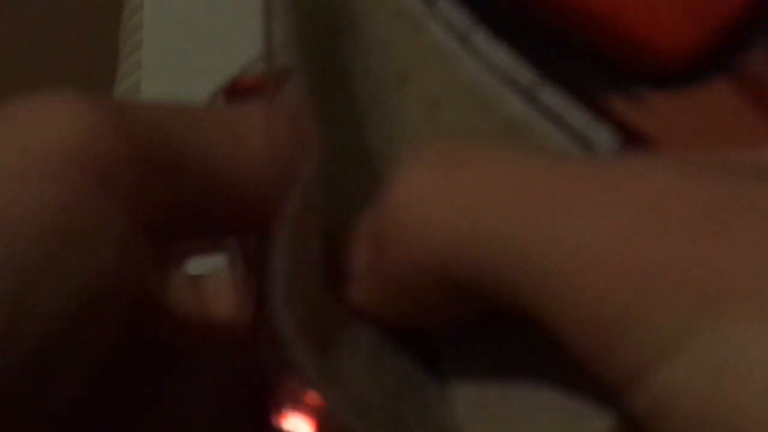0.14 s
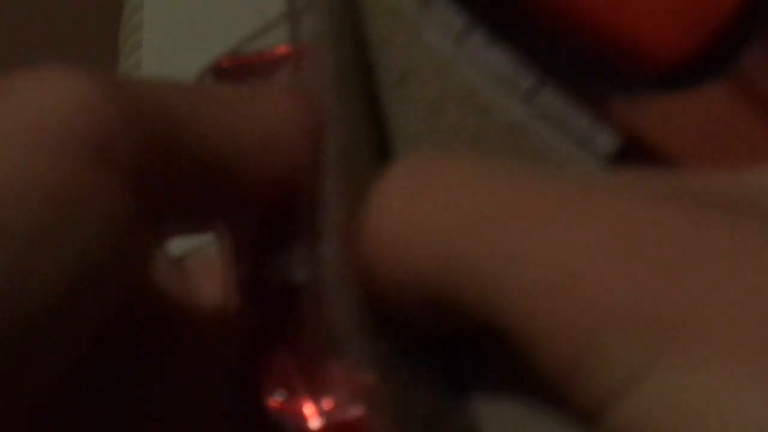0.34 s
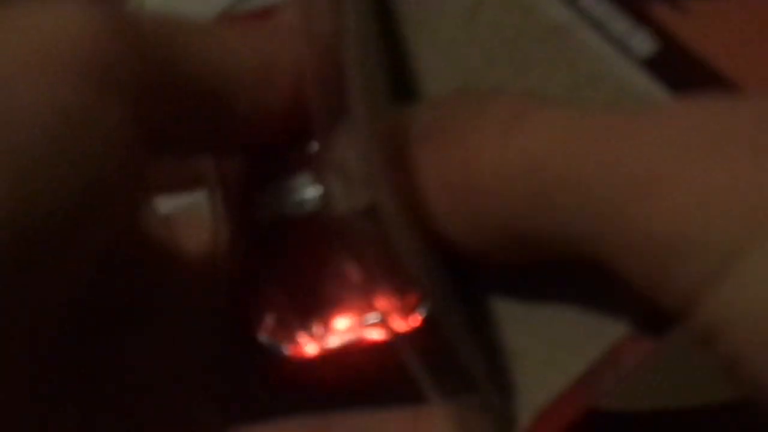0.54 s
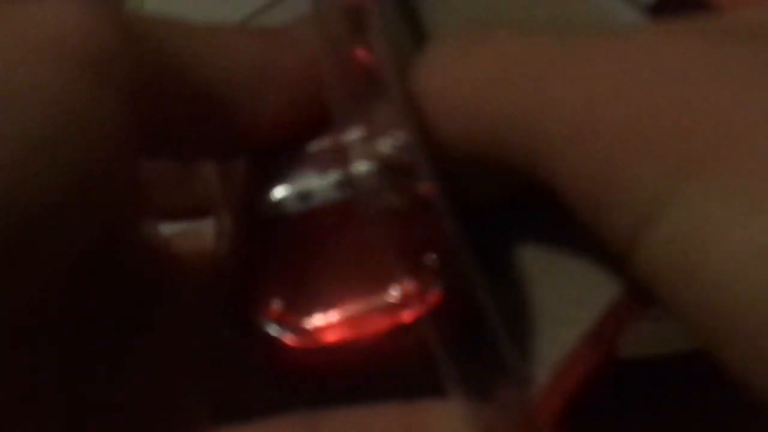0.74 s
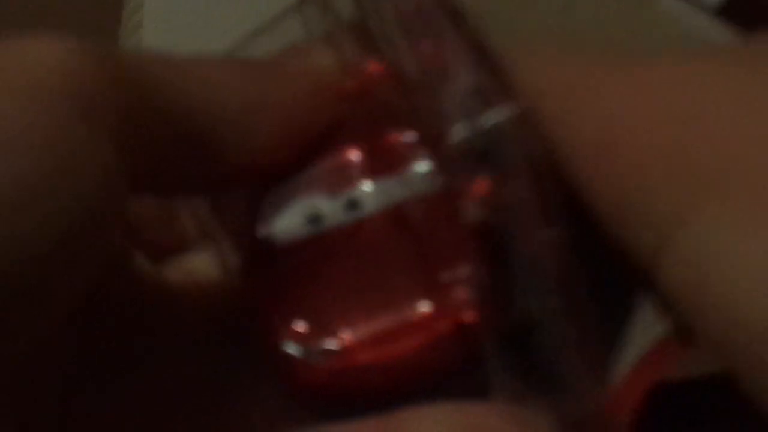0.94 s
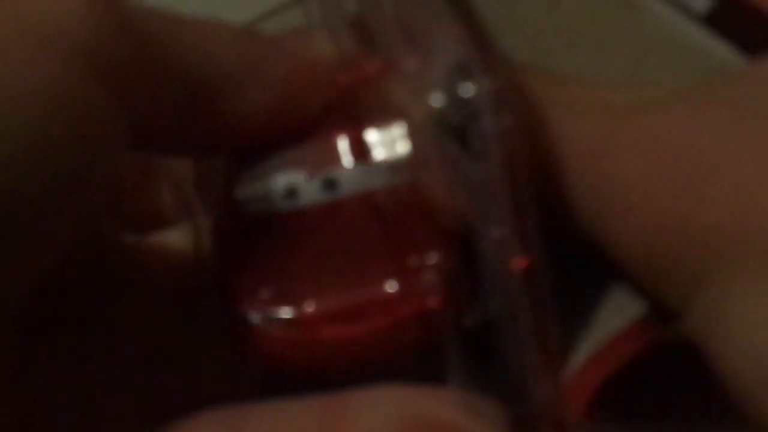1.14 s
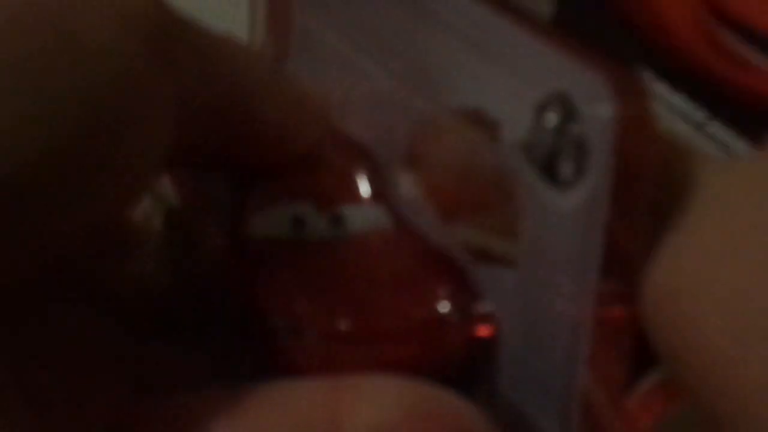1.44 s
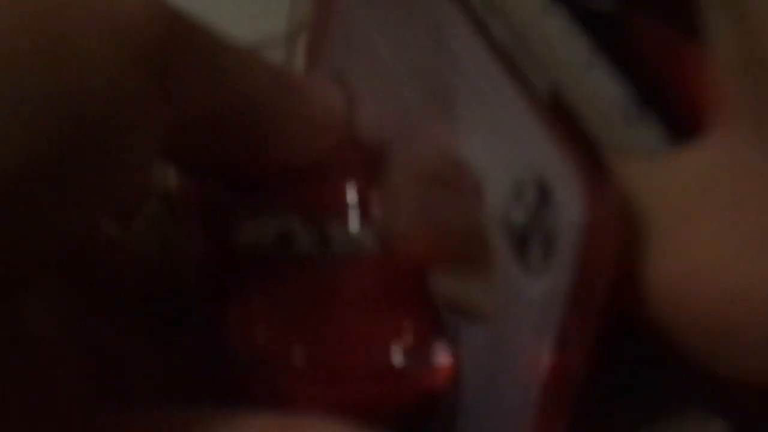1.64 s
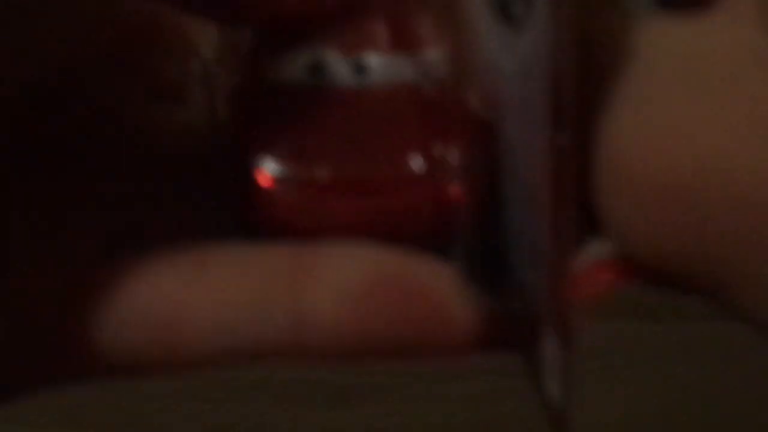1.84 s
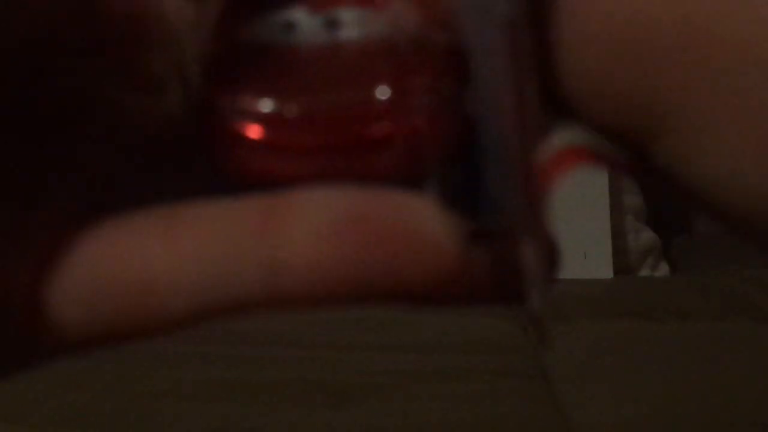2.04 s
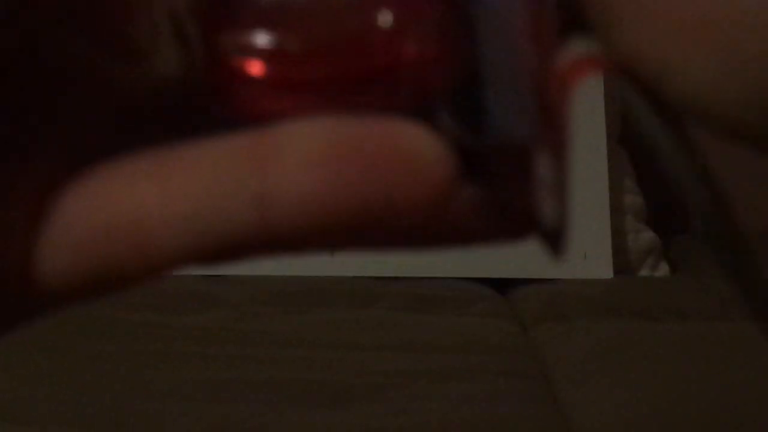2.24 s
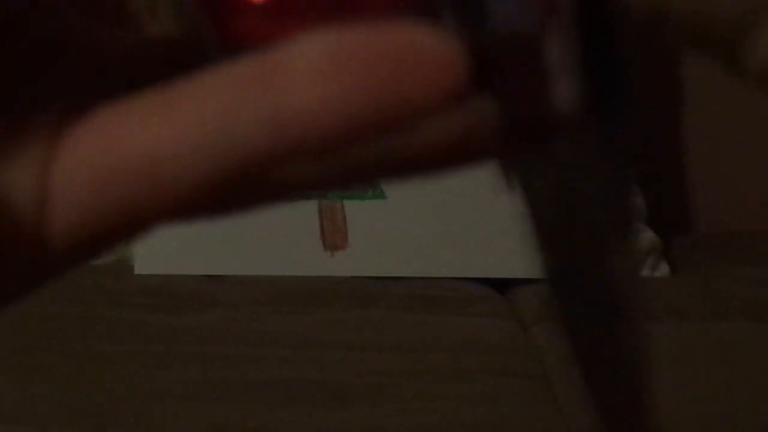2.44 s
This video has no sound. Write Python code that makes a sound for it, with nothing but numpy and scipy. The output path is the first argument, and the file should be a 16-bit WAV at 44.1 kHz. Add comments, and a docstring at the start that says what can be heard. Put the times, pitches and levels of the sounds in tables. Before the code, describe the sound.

Stiff plastic blister packaging snaps very loudly, then crackles and pops before its card tears free

```python
"""Blister pack prised off its card

A plastic blister pack is prised off its card by hand, close to the microphone in a small room. The stiff
shell buckles with one very loud snap and several small ones: noise cracks and dying sine modes. Filtered
runs of clicks make the crinkles, finger rubs, bumps and the card's tearing near the end; single creases
pop or tick and the freed card knocks. A table echo, a short room tail and a noise floor surround it all.
"""
import sys
import numpy as np
from scipy import signal
from scipy.fft import rfft, irfft
from scipy.io import wavfile

SR = 44100
rng = np.random.default_rng(int(sys.argv[2]) if len(sys.argv) > 2 else 0)


def int16_out(signal):
    """Quantize to a 16-bit WAV file."""
    q = np.round(np.clip(np.atleast_2d(signal).T, -1, 1) * 32767)
    wavfile.write(sys.argv[1], SR, q.astype(np.int16))


N = 114660
RING_SAMPLES = SR // 8
CRACK_T60_S = 0.0084  # base decay of a crack's noise
SLIPS_PER_S, SLIP_SPREAD_DB = 5500, 2  # hands on plastic

# Modes of the plastic shell. Each row: base frequency in Hz, relative level in dB, base t60 in s.
SHELL_MODES = [(688, -9, 0.0093), (1023, 3, 0.0048), (1247, -1.5, 0.0052), (1680, 0, 0.006),
               (1972, -2.5, 0.0072), (2214, -8.5, 0.01), (2920, -6, 0.005), (3246, -9, 0.012),
               (3920, -6, 0.0041), (4830, -9.5, 0.0016)]
# Bright spectrum of the clicks heard directly. Each row: frequency in Hz, relative level in dB.
FIZZ_SPECTRUM = [(1000, -1), (3500, 8), (6000, 5.5), (11000, 6), (15000, -2.5)]


def from_db(db):
    """Decibels to gain."""
    return 10 ** (np.asarray(db) / 20)


def rms_one(x):
    """Scale to rms 1."""
    return x / np.sqrt(np.mean(x ** 2) + 1e-20)


def add(out, start_s, x):
    """Mix x into out from start_s."""
    i = int(start_s * SR)
    out[i:i + len(x)] += x[:len(out) - i]


def dull(x, hz):
    """One-pole low-pass."""
    return signal.lfilter(*signal.butter(1, min(hz, SR / 2.2), fs=SR), x)


def low_cut(x, hz):
    """Two-pole high-pass."""
    return signal.lfilter(*signal.butter(2, hz, "high", fs=SR), x)


def resonate(x, hz, q):
    """Resonant band-pass at hz."""
    return signal.lfilter(*signal.iirpeak(hz, q, fs=SR), x)


def colour(x, spectrum, size=4096):
    """Causal minimum-phase filter with the given spectrum; white noise keeps its power."""
    hz, db = np.transpose(spectrum)
    bin_hz = np.arange(size // 2 + 1) * SR / size
    log_gain = np.log(from_db(np.interp(np.log(bin_hz + 1), np.log(hz), db)))
    # folding the cepstrum onto positive time makes the response causal
    cepstrum = np.r_[0, 2 * irfft(log_gain)[1:size // 2]]
    response = irfft(np.exp(rfft(cepstrum, size)))
    return signal.fftconvolve(x, response / np.linalg.norm(response))[:len(x)]


def ring(modes, stretch):
    """Struck modes as dying sines of alternating sign, peak 1; stretch scales every t60."""
    t = np.arange(RING_SAMPLES) / SR
    x = np.zeros(RING_SAMPLES)
    for k, (hz, db, t60_s) in enumerate(modes):
        decay = from_db(db - 60 * t / (t60_s * stretch))
        x += (-1) ** k * decay * np.sin(2 * np.pi * hz * t)
    return x / np.abs(x).max()


def grains(length_s, per_s, spread_db):
    """Clumps of random, uneven clicks that swell and fade, rms 1 over their length, then silence."""
    swell_shape = 0.38  # low: square bursts, high: rounded
    clump_s, clump_db = .002, 3  # the material sticks and lets go, so clicks come in clumps
    count = SR // 5
    index = np.arange(count)
    swell = np.sin(np.pi * np.clip(index / (length_s * SR), 0, 1)).clip(0) ** swell_shape
    sizes = from_db(spread_db * np.minimum(rng.exponential(1, count), 4))
    signs = rng.choice([-1, 1], count)
    clump_gains = from_db(clump_db * rng.standard_normal(count).clip(-2, 2))
    clumps = clump_gains[(index / (clump_s * SR)).astype(int)]
    clicks = rng.random(count) < per_s / SR
    x = swell * clumps * sizes * signs * clicks
    return x * np.sqrt(length_s * SR / (np.sum(x ** 2) + 1e-9))


def friction(rows, spectrum, per_s, spread_db):
    """Dense tiny slips sound through the material and hiss directly."""
    out = np.zeros(N)
    for start_s, length_s, db, fizz_db in rows:
        slips = grains(length_s, per_s, spread_db)
        body = rms_one(colour(slips, spectrum)) * slips.std()
        fizz = from_db(fizz_db) * colour(slips, FIZZ_SPECTRUM)
        add(out, start_s, from_db(db) * (body + fizz))
    return out


def snaps():
    """Each buckle cracks with broad noise, rings the shell and flexes the whole pack."""
    # Each row: start in s, level in dB, ring length factor, low-pass in Hz, flex level re shell in dB.
    buckles = [(0.1984, -20.5, 1.3, 1780, -33), (0.2121, 11, 2.5, 6400, -25.5),
               (0.586, -25.5, 2.4, 2360, -37.5), (0.6012, -20.5, 1.64, 2200, -39),
               (0.6319, -11, 0.46, 7100, -37), (1.5958, -12.5, 2.3, 2700, -17),
               (1.612, -27.5, 5.5, 5040, -15), (1.6277, -24.5, 2.5, 2390, -9)]
    # Modes of the flexing pack. Each row: frequency in Hz, relative level in dB, base t60 in s.
    flex_modes = [(204, -7, 0.039), (293, -2, 0.046), (387, -2, 0.042), (497, 3, 0.017)]
    crack_db, shell_low_hz = -13.5, 324
    out, t = np.zeros(N), np.arange(RING_SAMPLES) / SR
    for start_s, db, stretch, dull_hz, flex_db in buckles:
        decay = from_db(crack_db - 60 * t / (CRACK_T60_S * stretch))
        crack = rng.standard_normal(len(t)) * decay
        shell = low_cut(dull(ring(SHELL_MODES, stretch) + crack, dull_hz), shell_low_hz)
        flex = from_db(flex_db) * ring(flex_modes, 0.94)
        add(out, start_s, from_db(db) * (shell + flex))
    return out


def crinkles():
    """Runs of tiny creases excite the shell and one of its panels, with a bright fizz on top."""
    # Each row: start in s, length in s, level in dB, panel pitch in Hz, relative fizz level in dB.
    runs = [(0.224, 0.095, -32, 1900, -30), (0.800, 0.017, -46, 3330, -7.5),
            (0.8165, 0.014, -23.5, 3360, -12), (0.829, 0.033, -27.5, 1980, -8.5),
            (0.8465, 0.008, -29, 1280, -34), (0.853, 0.03, -38.5, 2020, -3), (1.015, 0.023, -38, 1000, -9),
            (1.041, 0.012, -36, 2100, -7), (1.302, 0.02, -40, 1280, -15.5), (1.355, 0.019, -37, 880, -23),
            (1.38, 0.029, -41, 2460, -12), (1.81, 0.0082, -43, 1200, -11), (1.862, 0.069, -45, 1260, -13)]
    # Each row: frequency in Hz, relative level in dB.
    shell_spectrum = [(100, -17.5), (450, -0.5), (900, 3), (1900, -1), (3400, -1.5), (5000, -8),
                      (15000, -75)]
    panel_q, panel_db = 2.3, 1.5
    creases_per_s, crease_spread_db = 7000, 0.5
    out = np.zeros(N)
    for start_s, length_s, db, panel_hz, fizz_db in runs:
        creases = grains(length_s, creases_per_s, crease_spread_db)
        shell = colour(creases, shell_spectrum)
        panel = resonate(shell, panel_hz, panel_q)
        body = rms_one(rms_one(shell) + from_db(panel_db) * rms_one(panel)) * creases.std()
        fizz = from_db(fizz_db) * colour(creases, FIZZ_SPECTRUM)
        add(out, start_s, from_db(db) * (body + fizz))
    return out


def rubbing():
    """Fingers and card slide on the plastic in many tiny slips."""
    # Each row: start in s, length in s, level in dB, relative hiss level in dB.
    rubs = [(0.455, 0.05, -45.5, -11.5), (0.67, 0.061, -49.5, -10.5), (1.252, 0.064, -46.5, -14),
            (1.405, 0.042, -47, -11), (1.66, 0.11, -54, -14), (1.788, 0.083, -50, -8),
            (1.98, 0.069, -53.5, -8), (2.04, 0.096, -51.5, -0.5)]
    # Each row: frequency in Hz, relative level in dB.
    rub_spectrum = [(100, -21.5), (300, -11), (700, 8.5), (2000, 4.5), (6000, -5), (15000, -27)]
    return friction(rubs, rub_spectrum, SLIPS_PER_S, SLIP_SPREAD_DB)


def pops():
    """A crease pops through: the shell rings around its panel's pitch, under a short bright crack."""
    # Each row: start in s, level in dB, panel pitch in Hz.
    creases = [(0.783, -36.5, 600), (0.8176, -9.5, 2870), (0.8249, -12.5, 2370), (0.8286, -17, 1900),
               (0.8483, -12, 1200), (1.0222, -21.5, 2900), (1.0240, -17.5, 990), (1.0667, -25.5, 3260),
               (1.0715, -28.5, 2680), (1.311, -31, 1260), (1.364, -33.5, 915), (1.4012, -25.5, 3250),
               (2.429, -28, 1490), (2.4564, -24, 4750)]
    panel_q, ring_stretch, crack_db = 1.97, 1.6, -12
    detune = 0.11  # largest log-frequency shift: bending retunes the shell from pop to pop
    out, t = np.zeros(N), np.arange(RING_SAMPLES) / SR
    for start_s, db, panel_hz in creases:
        bend = np.exp(detune * (2 * rng.random() - 1))
        bent_modes = [(hz * bend, mode_db, t60_s) for hz, mode_db, t60_s in SHELL_MODES]
        panel = resonate(ring(bent_modes, ring_stretch), panel_hz, panel_q)
        crack = rng.standard_normal(len(t)) * from_db(crack_db - 60 * t / CRACK_T60_S)
        pop = panel / np.abs(panel).max() + colour(crack, FIZZ_SPECTRUM)
        add(out, start_s, from_db(db) * pop)
    return out


def ticks():
    """Lone creases, each one sharp click."""
    # Each row: start in s, level in dB.
    clicks = [(1.2703, -18.5), (2.061, -20.5), (2.4420, -13)]
    out = np.zeros(N)
    for start_s, db in clicks:
        add(out, start_s, from_db([db]))
    return colour(out, FIZZ_SPECTRUM)


def bumps():
    """Soft low knocks of slips as the grip shifts on the pack."""
    # Each row: start in s, length in s, level in dB.
    knocks = [(1.292, 0.04, -47.5), (1.358, 0.05, -42), (1.595, 0.016, -37)]
    # Each row: frequency in Hz, relative level in dB.
    bump_spectrum = [(90, -6.5), (170, -18), (400, -9), (2000, -33)]
    out = np.zeros(N)
    for start_s, length_s, db in knocks:
        slips = grains(length_s, SLIPS_PER_S, SLIP_SPREAD_DB)
        body = rms_one(colour(slips, bump_spectrum)) * slips.std()
        add(out, start_s, from_db(db) * body)
    return out


def tearing():
    """The card gives way in jerks, each a burst of parting fibres."""
    # Each row: start in s, length in s, level in dB, relative fibre fizz level in dB.
    jerks = [(2.352, 0.044, -53.5, 14.5), (2.3598, 0.0062, -29.5, -7), (2.3668, 0.0039, -27.5, 2),
             (2.3742, 0.0043, -39.5, 11), (2.376, 0.048, -40, -7), (2.4088, 0.0046, -27.5, 1.5),
             (2.413, 0.043, -36, -4.5), (2.454, 0.0068, -25, -12.5), (2.46, 0.071, -45, -1.5)]
    # Each row: frequency in Hz, relative level in dB.
    card_spectrum = [(100, -36), (380, -4.5), (700, -3), (1900, 0), (2600, -4.5), (15000, -29)]
    fibres_per_s, fibre_spread_db = 4300, 2
    return friction(jerks, card_spectrum, fibres_per_s, fibre_spread_db)


def releases():
    """Each time the card springs free it gives a hollow knock, a little higher than the last."""
    # Each row: start in s, level in dB.
    knocks = [(2.3605, -24), (2.390, -25), (2.4098, -16), (2.4562, -21.5)]
    # Modes of the card at its first release. Each row: frequency in Hz, relative level in dB, base t60 in s.
    card_modes = [(372, -12, .04), (640, -3, 0.061), (1118, 0, 0.028)]
    rise_per_s = 1.4  # the part still held gets shorter, so its pitch climbs
    first_s = knocks[0][0]
    out = np.zeros(N)
    for start_s, db in knocks:
        rise = 1 + rise_per_s * (start_s - first_s)
        risen_modes = [(hz * rise, mode_db, t60_s) for hz, mode_db, t60_s in card_modes]
        add(out, start_s, from_db(db) * ring(risen_modes, 0.99))
    return out


def table_echo(pack):
    """One delayed, dulled reflection off the table."""
    delay_s, echo_db, dull_hz = .0073, -17.5, 2560
    out = np.zeros(N)
    add(out, delay_s, from_db(echo_db) * dull(pack, dull_hz))
    return out


def diffuse_tail(x):
    """A noise tail, drawn anew at each call, that builds up and dies after each sound."""
    # Each row: frequency in Hz, relative level in dB.
    tail_spectrum = [(70, -5), (200, 5.5), (500, 3), (2000, 4), (4500, 6), (15000, -0.5)]
    t60_s, build_s, tail_db = 0.49, 0.0032, -11
    t = np.arange(SR) / SR
    envelope = from_db(-60 * t / t60_s) * (1 - np.exp(-t / build_s))
    tail = colour(rng.standard_normal(SR), tail_spectrum) * envelope
    return signal.fftconvolve(x, from_db(tail_db) * tail / np.linalg.norm(tail))[:N]


def noise_floor():
    """Steady room tone and hiss from coloured noise."""
    # Each row: frequency in Hz, relative level in dB.
    floor_spectrum = [(60, -20), (115, -10), (550, -3), (1400, -4), (4500, -14.5), (15000, -18)]
    return from_db(-54) * colour(rng.standard_normal(N), floor_spectrum)


def scene(wall_count=4):
    """The pack, its table echo, the room and the floor; a snap cracks differently towards each wall."""
    handling = crinkles() + rubbing() + pops() + ticks() + bumps() + tearing() + releases()
    pack = handling + snaps()
    walls = sum(diffuse_tail(handling + snaps()) for _ in range(wall_count)) / np.sqrt(wall_count)
    mid = pack + table_echo(pack) + walls + noise_floor()
    # faint stereo width: a quiet, independent noise tail, opposite in the two channels
    side = from_db(-51.5) * diffuse_tail(pack)
    return np.array([mid + side, mid - side])


def record(dry):
    """The loudest snap overloads the input; the recorder thins the bass, hisses faintly and cuts the top."""
    overload, low_hz, hiss_db, cutoff_hz = .9, 76, -73.5, 15000
    clipped = np.clip(dry, -overload, overload)
    hiss = from_db(hiss_db) * rng.standard_normal((2, N))
    x = low_cut(clipped, low_hz) + hiss
    top_cut = signal.ellip(10, .1, 70, cutoff_hz, fs=SR, output="sos")
    return signal.sosfilt(top_cut, x)


dry = scene()
out = record(dry)
int16_out(out)
```